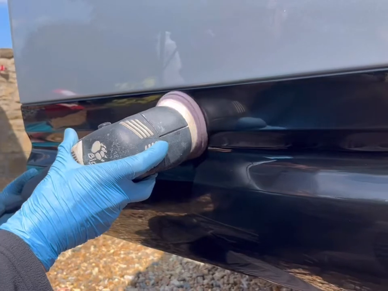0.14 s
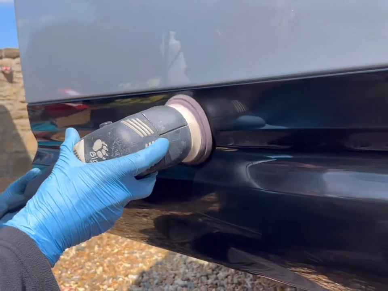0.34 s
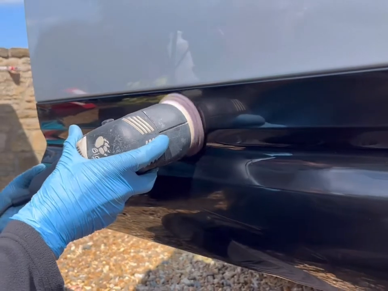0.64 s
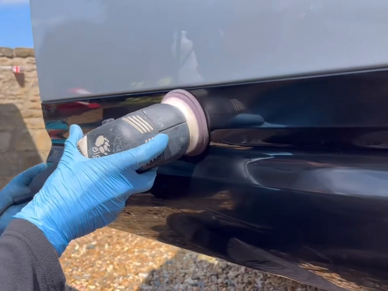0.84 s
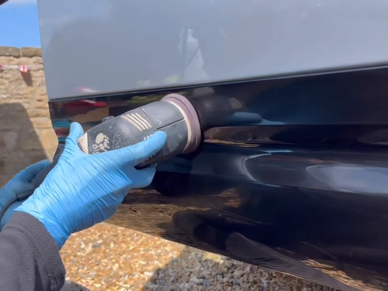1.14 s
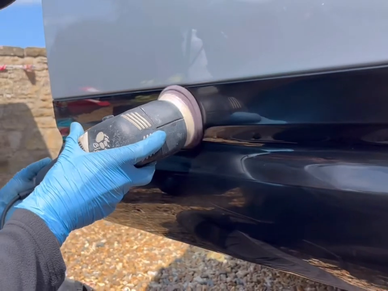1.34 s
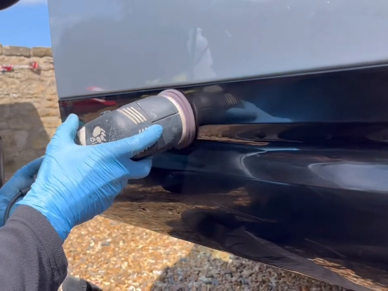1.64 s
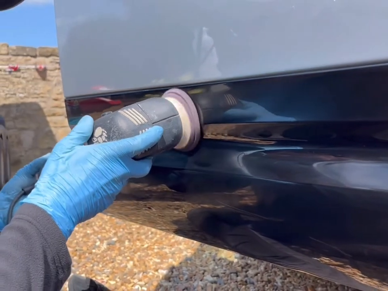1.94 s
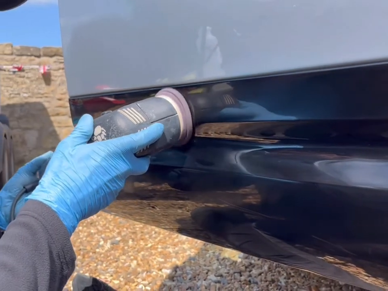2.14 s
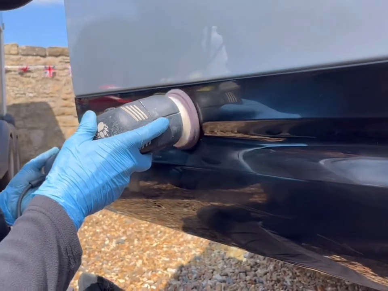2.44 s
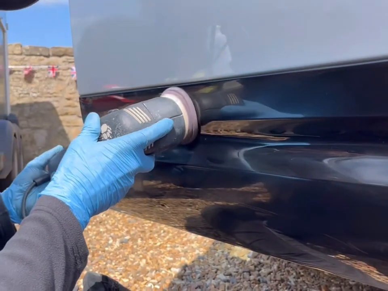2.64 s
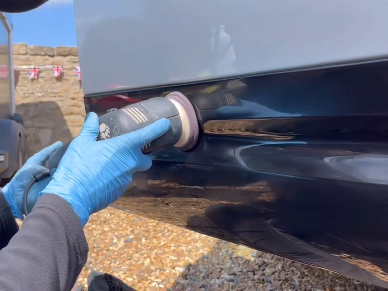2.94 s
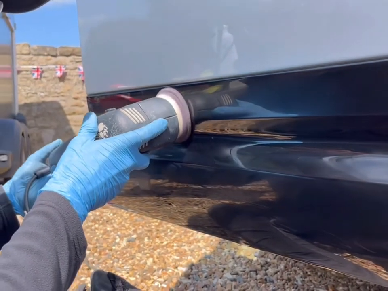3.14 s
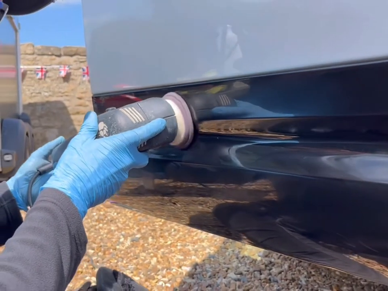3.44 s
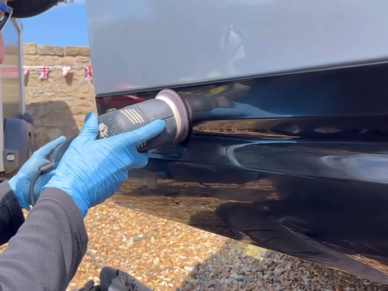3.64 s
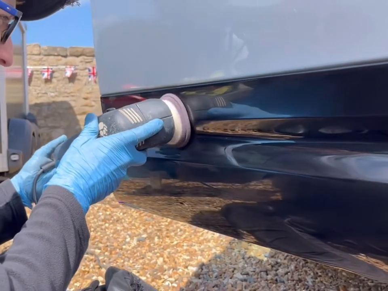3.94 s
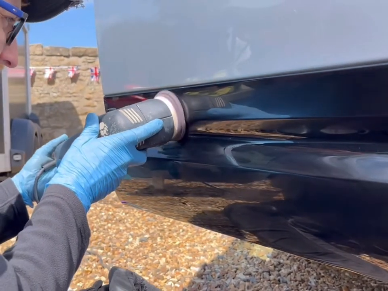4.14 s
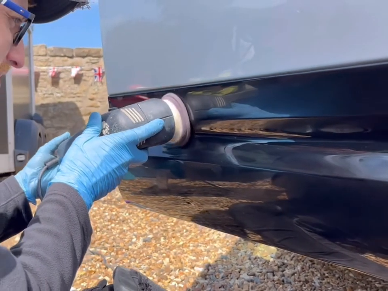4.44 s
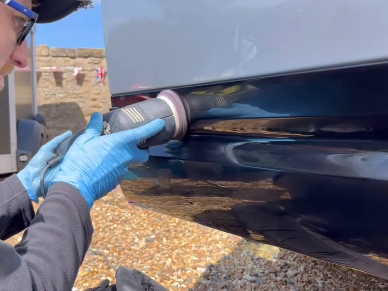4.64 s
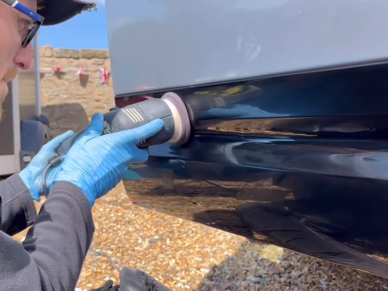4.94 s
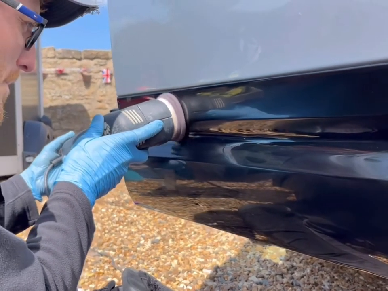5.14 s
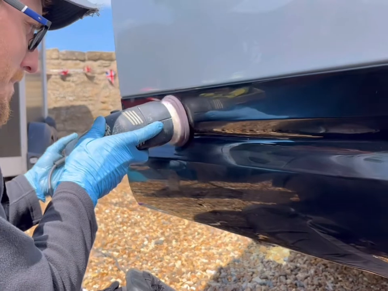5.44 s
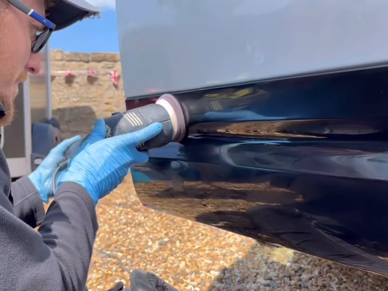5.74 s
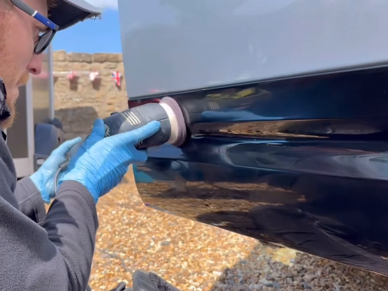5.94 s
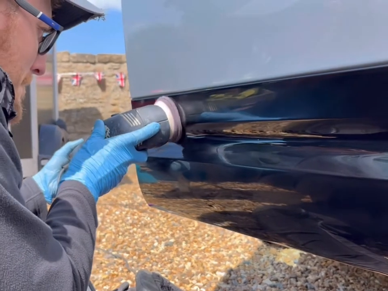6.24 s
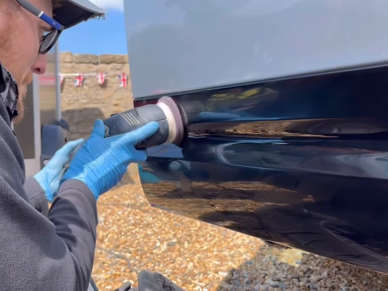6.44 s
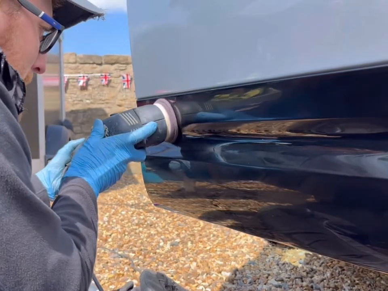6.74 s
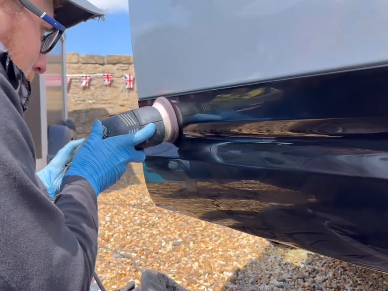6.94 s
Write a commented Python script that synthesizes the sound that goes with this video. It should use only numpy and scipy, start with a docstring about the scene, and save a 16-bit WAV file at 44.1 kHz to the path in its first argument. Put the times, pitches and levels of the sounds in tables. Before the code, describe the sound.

A close handheld phone hears an electric buffing machine already running at nearly constant speed outdoors. Its orbiting pad hums deeply and rubs the paint with a grainy buzz, while the motor sings in shifting high tones and its fan hisses. Early muffled knocks and wind buffets fade away; the hum swells around two seconds, then weakens as the tool turns away. It is still running at the end.

```python
"""A dual-action polisher buffs a car's side panel outdoors, at nearly steady speed, turning away from a phone.
The orbiting pad pumps the air with a low hum and rubs the paint, and its bearing rasps once an orbit.
The mains motor whines in sweeping lobes, and its fan and brushes rush through the vents.
Light wind reaches the microphone, and dull knocks on the phone are heard in the first second and a half."""
import sys
import numpy as np
from scipy import signal
from scipy.fft import rfft, irfft
from scipy.io import wavfile
from scipy.ndimage import uniform_filter1d

SR = 44100
rng = np.random.default_rng(int(sys.argv[2]) if len(sys.argv) > 2 else 0)


def output_pcm(signal):
    """Save a mono or channel-first signal as 16-bit PCM at the path in sys.argv[1].

    Samples are clipped to [-1, 1] before scaling.
    """
    pcm = np.clip(np.atleast_2d(signal).T, -1, 1) * 32767
    wavfile.write(sys.argv[1], SR, np.round(pcm).astype(np.int16))


N = 313551
TIME = np.arange(N) / SR  # seconds
FRAME = 2048  # samples in each slice of noise that gets its own colour
MAINS_HZ = 50
GEAR = 9 / 43  # pad orbits per turn of the motor


def undb(db):
    """Turn decibels into gain."""
    return 10 ** (np.asarray(db) / 20)


def curves(table, t=TIME):
    """Read the columns of a timed table at times t, in straight lines between rows."""
    seconds, *columns = np.transpose(table)
    return [np.interp(t, seconds, column) for column in columns]


def over_hz(table, hz):
    """Read the columns of a frequency table, in straight lines on a log axis."""
    table_hz, *columns = np.transpose(table)
    log_hz = np.log(np.maximum(hz, 1))
    return [np.interp(log_hz, np.log(table_hz), column) for column in columns]


def walk(rate):
    """Smooth chance of spread 1 that changes about rate times a second."""
    hz = np.arange(N // 2 + 1) / N * SR
    smoothing = np.exp(-(2 * hz / rate) ** 2)
    x = irfft(rfft(rng.standard_normal(N)) * smoothing, N)
    return (x - x.mean()) / x.std()


def turning(hz):
    """Angle in radians of a shaft that turns hz times a second."""
    return 2 * np.pi * np.cumsum(hz) / SR


def bell(x, centre, width):
    """A bump of height 1, half as high width / 2 from its centre."""
    return .5 ** ((2 * (x - centre) / width) ** 2)


# How the tool is held.
# Each row: time in seconds, how far the vents are turned away from 0 (facing the phone) to 1.
GRIP = [(0, 0), (1.2, 0.13), (2.3, 0.37), (3.3, 0.34), (4.1, 0.54), (5.2, 0.54), (7.1, 0.83)]


def turned(facing, away, t=TIME):
    """A value that moves from facing to away as the vents turn from the phone."""
    return facing + (away - facing) * curves(GRIP, t)[0]


# How the two microphone ports hear the tool.
# Each row: frequency in Hz, phase by which left leads in radians, likeness of the two from 0 to 1,
# level of left minus right in dB.
PORTS = [(80.0, -0.24, 0.99, -1.3), (350.0, -0.5, 0.82, 0.4), (700.0, -0.25, 0.85, -3.4),
         (1150.0, -0.35, 0.9, -3.4), (1500, -0.3, 0.74, -2.4), (1850.0, 0.0, 0.99, -1.1),
         (2350.0, 1.15, 0.8, -0.8), (2680.0, 0.5, 0.75, -1.4), (3250.0, 1.75, 0.76, 1.2),
         (4200.0, -0.1, 0.58, 0.8), (4900, -0.2, 0.72, 1.0), (5800.0, -0.6, 0.74, 1.6),
         (6600, -1.0, 0.62, 0.9), (7050.0, -1.8, 0.65, 0.4), (7400, -2.5, 0.8, 0), (7800, -3.08, 0.98, 0),
         (8300.0, -3.14, 0.998, 0), (9000, -3.2, 0.99, 0), (9400.0, -3.9, 0.88, 0), (10000, -4.4, 0.76, 0),
         (10800.0, -6.1, 0.8, 0), (11300, -6.28, 0.97, 0), (13200.0, -6.3, 0.96, 0),
         (14100.0, -8.3, 0.86, -0.1)]


def port_gains(hz):
    """Complex gains of the left and right port for sound from the tool; mean power 1."""
    lead, _, pan_db = over_hz(PORTS, hz)
    left = undb(pan_db / 2) * np.exp(.5j * lead)
    right = undb(-pan_db / 2) * np.exp(-.5j * lead)
    pair = np.array([left, right])
    return pair / np.sqrt(np.mean(abs(pair) ** 2, axis=0))


def tone(angle, hz, db):
    """A partial near hz at both ports; db is its rms level."""
    return np.sqrt(2) * undb(db) * np.real(port_gains(hz)[:, None] * np.exp(1j * angle))


def rush(drive, colour, patchy_db):
    """Turbulence of strength drive, shaped by colour(Hz, s) in dB, at both ports; rms 1 over half a second."""
    noise = rng.standard_normal((3, N)) * drive
    hz, t, (direct, *scattered) = signal.stft(noise, SR, nperseg=FRAME)
    hz = hz[:, None]
    # both ports share the direct noise, and each has scattered noise of its own
    alike = np.clip(over_hz(PORTS, hz)[1], 0, 1)
    mixed = np.sqrt(alike) * direct + np.sqrt(1 - alike) * np.array(scattered)
    # reflections off the panel shift as the tool moves, so the colour drifts in patches
    patches = rng.standard_normal(direct.shape)
    for _ in range(2):
        patches = uniform_filter1d(patches, size=6, axis=0)
        patches = uniform_filter1d(patches, size=30, axis=1, mode="wrap")
    gain = undb(colour(hz, t) + patchy_db * patches / patches.std())
    x = signal.istft(port_gains(hz) * mixed * gain, SR, nperseg=FRAME)[1][:, :N]
    return x / np.sqrt(uniform_filter1d(np.mean(x ** 2, axis=0), size=SR // 2))


def evened(x, size):
    """Noise held at even strength over size samples, so bursts land with the force given to them; rms 1."""
    power = np.mean(x ** 2, axis=0)
    for _ in range(2):
        power = uniform_filter1d(power, size=size)
    return x / np.sqrt(power)


def body(spectrum, modes, hz, t):
    """A broad spectrum with resonances that change as the tool is turned, in dB."""
    boosts = sum(bell(hz, f, width) * turned(facing, away, t) for f, width, facing, away in modes)
    return over_hz(spectrum, hz)[0] + boosts


def swells(table, hz, t):
    """Boost in dB of resonances that come and go as the tool moves."""
    return sum(db * bell(t, s, length) * bell(hz, f, width) for s, length, f, width, db in table)


def ripple(shaft):
    """The motor's torque pulses with each half wave of the mains and with each turn of the shaft."""
    return 1 + .11 * np.cos(4 * np.pi * MAINS_HZ * TIME) + .06 * np.cos(shaft)


# How strongly the pad shakes the panel.
# Each row: time in seconds, level of the hum in dB.
HUM = [(0.0, -22), (0.11, -16), (0.24, -15), (0.7, -13.5), (1.4, -13), (1.95, -12), (2.4, -12.5),
       (2.7, -14.5), (3.05, -14.2), (3.55, -15.8), (3.9, -15.5), (4.3, -15.5), (5.0, -16.5), (5.7, -18),
       (6.65, -19), (7.0, -20)]
# Overtones that swell and sink as the pad crosses bellies and nodes of the panel.
# Each key is a multiple of the orbit; each row: time in seconds, middle level in dB.
HUM_OVERTONES = { 2: [(0, -38), (0.95, -38), (1.5, -34.5), (1.9, -32.2), (2.3, -31.6), (2.8, -32.4),
                 (3.3, -35), (3.75, -38), (4.1, -41.5), (5.5, -48.5), (6.3, -55), (7.1, -56)], 3: [(0, -50),
                 (0.35, -43), (0.8, -47.5), (1.55, -42.5), (2.3, -58), (2.9, -51), (3.6, -51), (4.3, -48),
                 (5, -49), (5.6, -54.5), (7.1, -63)], 4: [(0, -50), (1.5, -50), (1.95, -69), (2.6, -56),
                 (7.1, -71)]}
# Moments when the hum dips briefly.
# Each row: middle in seconds, length at half depth in seconds, change in dB.
HUM_DIPS = [(0.195, 0.03, -2), (0.5, 0.05, -2.5), (1.094, 0.04, -2), (1.341, 0.013, -5), (1.387, 0.022, 0)]


def hum(orbit, shaft, orbit_hz, spin_hz=6.5, spin_db=-47, bearing_db=-56, beat_db=-60, waver_db=0.4):
    """The eccentric pad shakes the panel once an orbit; its slow free spin beats against that."""
    dips_db = sum(db * bell(TIME, s, length) for s, length, db in HUM_DIPS)
    harmonics = tone(orbit + np.pi, orbit_hz, curves(HUM)[0] + dips_db)
    for k, levels in HUM_OVERTONES.items():
        level_db = curves(levels)[0] + waver_db * walk(4.5)
        harmonics = harmonics + tone(k * orbit + np.pi, k * orbit_hz, level_db)
    spin = turning(spin_hz * (1 + 0.11 * walk(1.5)))
    throb = tone(orbit - spin, orbit_hz, spin_db + 2 * walk(2.7))
    # faint extra tones: a bearing cage at a third of the motor speed, and the motor beating with the orbit
    cage = tone(shaft / 3, 2 * orbit_hz, bearing_db + 2 * walk(4))
    beat = tone(shaft - orbit, 4 * orbit_hz, beat_db + 2 * walk(3.4))
    return harmonics + throb + cage + beat


def lobes(at, spacing, depth_db):
    """Broad swells and narrow gaps of a beam that sweeps past, in dB below its peak."""
    gap = undb(-depth_db) ** 2
    return 10 * np.log10(gap + (1 - gap) * np.cos(np.pi * (TIME - at) / spacing) ** 2)


# High motor tones that leave the tool in lobes that sweep past the phone.
# Each row: multiple of the motor speed, middle peak level in dB with the vents facing, the same turned away,
# time of one lobe in seconds, time between lobes in seconds, depth of the gaps in dB.
BEAMED_ORDERS = [(24, -37.5, -42.5, 3.09, 0.93, 4), (30, -46, -49.5, 1.33, 1.23, 0.5),
                 (36, -40.5, -46, 3.2, 0.86, 6)]
# Motor tones whose levels come and go as the vents turn. # Each key is a multiple of the motor speed; each row:
# time in seconds, middle level in dB.
WHINE_LEVELS = { 1: [(0, -45.5), (1, -48.5), (2.8, -49.5), (3.6, -52), (5.2, -51.5), (7.1, -49.5)],
                6: [(0, -39.5), (0.7, -43), (1.4, -41.5), (2.65, -42.5), (3, -37.5), (3.6, -34.5),
                (4.6, -36.5), (5.8, -35.5), (6.3, -43.5), (6.8, -49)], 7: [(0, -43), (1.2, -47), (2.3, -47),
                (3.3, -56), (4.2, -43), (5.4, -46), (6.1, -39), (7.1, -44)], 9: [(0, -31.5), (0.18, -38),
                (0.33, -41), (0.62, -44), (0.85, -36), (1.25, -36), (1.45, -39), (1.7, -40.5),
                (2.35, -38.5), (3.1, -56), (3.6, -46), (4.5, -44), (5.3, -64), (7.1, -60)], 10: [(0, -52),
                (2.2, -45), (3.3, -53), (7.1, -58)], 12: [(0, -45), (0.35, -40), (0.8, -47), (1.6, -44),
                (2.1, -44), (3.1, -42.5), (3.5, -44), (4.1, -40), (5.6, -40.5), (6.45, -37.5), (7, -44.5)],
                18: [(0.05, -35), (0.35, -47), (1, -36), (1.7, -43), (2.6, -38.5), (3.45, -58), (4, -41.5),
                (4.7, -48), (5.1, -43.5), (7.1, -49)]}
# Further motor tones, whose levels wander as the tool moves. # Each row: multiple of the motor speed, middle
# level in dB before a 1 dB cut.
MOTOR_ORDERS = [(2, -40), (3, -45), (4, -52), (5, -48.5), (8, -46), (11, -55), (13, -55), (16, -56),
                (17, -56), (26, -58), (27, -58), (28, -57)]
WHINE_ROUGH, WHINE_FLUTTER = 0.26, 0.28  # irregular and spinning change of strength, as parts of 1


def whine(shaft, shaft_hz, orbit, others_db=-1.0, stray_db=2.24, waver_db=0.6, fade_db=6.0):
    """Fan blades, gear teeth and commutator sing at multiples of the motor speed."""
    orders = []
    for k, facing, away, at, spacing, depth in BEAMED_ORDERS:
        beam_db = turned(facing, away) + lobes(at, spacing, depth)
        orders.append((k, beam_db + stray_db * walk(10.0)))
    for k, levels in WHINE_LEVELS.items():
        orders.append((k, curves(levels)[0] + waver_db * walk(6.9)))
    for k, db in MOTOR_ORDERS:
        # short waves fade more than long ones as the tool moves
        orders.append((k, db + others_db + fade_db * np.tanh(k / 10) * walk(5.3)))
    # the orbit shakes the whole tool, and play in the gears makes the shaft flutter
    angle = shaft + .009 * np.sin(orbit) + .0035 * walk(60)
    # the spinning pad reflects the tones, so each flutters a little
    spin = turning(9.5 + .8 * walk(2))
    total = 0
    for k, db in orders:
        flutter = 1 + WHINE_FLUTTER * np.cos(spin + 2 * np.pi * rng.random()) + WHINE_ROUGH * walk(104)
        start_angle = 2 * np.pi * rng.random()
        total = total + tone(k * angle + start_angle, k * shaft_hz, db) * flutter
    return total


# Broad colour of foam rubbing paint.
# Each row: frequency in Hz, relative level in dB per Hz.
RUB = [(60, -49), (200, -15.5), (340, -16.5), (450, -11.5), (600, -3.5), (1000, -5), (1500, -9.5),
       (1750, -12.5), (2400, -13.5), (6000, -88)]
# Resonances of the panel.
# Each row: frequency in Hz, width in Hz, boost in dB with the vents facing, boost in dB turned away.
PANEL_MODES = [(334, 59, -2, -3.5), (487, 99, 3, -0.5), (664, 105, 4.5, 4.5), (772, 70, 7, 4.5),
               (1083, 153, 8, 6), (1158, 93, 6.5, 3.5), (1384, 35, 6.5, 7.5), (1475, 96, 8.5, 2)]
# Panel resonances that swell or sink as the pad passes over them.
# Each row: middle in seconds, length in seconds, frequency in Hz, width in Hz, boost in dB.
PANEL_SWELLS = [(0.44, 0.65, 690, 150, 2.5), (2.7, 2.1, 1690, 150, -12), (3.1, 0.87, 930, 150, -4),
                (3.8, 1.3, 650, 97, 2.5), (4.87, 0.32, 670, 71, 3.5), (4.85, 0.34, 1040, 150, 4),
                (6.15, 2.1, 900, 120, 2.5), (7, 1.1, 1340, 170, 6.5), (2.4, 1.2, 1480, 180, 1.5),
                (5.06, 0.49, 520, 210, 2.5)]
RUB_DB = -28.5  # level of the rubbing at full pressure


def pad(orbit, shaft, load_db, grab_db=0.43):
    """Foam rubs the paint, buzzing with the motor's torque and fluttering as it spins, and rings the panel."""
    spin = turning(9.5 + 1.3 * walk(2))
    flutter = 1 + .075 * np.cos(spin) + .055 * np.cos(orbit + 1.8)
    drive = flutter * ripple(shaft) * undb(grab_db * walk(44))

    def colour(hz, t):
        return body(RUB, PANEL_MODES, hz, t) + swells(PANEL_SWELLS, hz, t)

    return undb(RUB_DB + load_db) * rush(drive, colour, patchy_db=0.64)


# Ring of the eccentric's bearing.
# Each row: frequency in Hz, relative level in dB per Hz.
BEARING = [(500, -45), (2200, -24), (2500, -12), (2700, -5), (2850, -7), (2950, -1), (3040, 0.5),
           (3180, -5), (3550, -19), (5000, -27), (6000, -18), (7000, -32), (15000, -55)]
RASP_DB = -26.3  # peak strength of each scrape, facing and at full pressure, before the motor's ripple


def rasp(orbit, shaft, load_db, away_db=-4.0, db_per_load=2.0):
    """Once an orbit the counterweight loads the bearing, which scrapes; quieter as the tool turns away."""
    scrape = np.exp(2.0 * (np.cos(orbit + .6) - 1)) * ripple(shaft)
    ring = rush(1, lambda hz, t: over_hz(BEARING, hz)[0], patchy_db=2.5)
    level_db = RASP_DB + turned(0, away_db) + db_per_load * load_db
    return undb(level_db) * scrape * evened(ring, size=90)


# Broad colour of the vent air.
# Each row: frequency in Hz, relative level in dB per Hz.
AIR = [(500, -12), (1500, -6), (2200, -2), (2900, 6), (3600, -8), (4500, 2), (5500, -2.5), (7500, -10),
       (9400, -13.5), (10700, -3.5), (12200, -9), (13600, -9), (15000, -45)]
# Resonances of the tool's housing.
# Each row: frequency in Hz, width in Hz, boost in dB with the vents facing, boost in dB turned away.
HOUSING_MODES = [(1950, 230, 6.2, -1), (2536, 140, 8.8, -2), (2694, 150, 0.5, 7.5), (3030, 143, 6.3, 3.5),
                 (3330, 360, 7.6, 1.5), (3880, 380, 6.2, 0), (4330, 500, 1.1, 1.5), (6250, 1400, 9.7, 4)]
# Vent slots that point at the phone, or away from it, in passing.
# Each row: middle in seconds, length in seconds, frequency in Hz, width in Hz, boost in dB.
VENT_SWELLS = [(0.4, 1.9, 3140, 650, 4.5), (2, 1.1, 3780, 220, 4.5), (3.3, 0.88, 6000, 490, 10.5),
               (4.96, 1, 2820, 340, 7), (7.1, 0.92, 4800, 250, 4.5), (3.44, 1.2, 3020, 300, 8),
               (7.1, 1.5, 3550, 330, 0), (3.2, 0.68, 11700, 3000, 3.5), (4.55, 0.5, 12000, 2500, -3),
               (5, 0.27, 11700, 2000, 4), (0.9, 2.6, 4540, 110, 2), (0.9, 1.7, 5730, 450, -4),
               (0.9, 2.2, 6120, 270, 2), (4.7, 3.5, 6500, 300, -5), (4.5, 5.0, 2850, 120, -4),
               (6.4, 0.7, 4690, 130, 4), (3.3, 1.2, 3600, 350, -2.5)]
AIR_DB, AIR_TURNED_DB = -26.5, -5  # level when facing, and its change when turned fully away


def vents(shaft, orbit, sputter_db=1.2):
    """Cooling air and sputtering brushes hiss, pulsing with the motor and slightly with the orbit."""
    pulse = ripple(shaft) + .04 * np.cos(orbit + 1.2)
    sputter = undb(sputter_db * walk(330))

    def colour(hz, t):
        return body(AIR, HOUSING_MODES, hz, t) + swells(VENT_SWELLS, hz, t)

    return undb(AIR_DB + turned(0, AIR_TURNED_DB)) * rush(pulse * sputter, colour, patchy_db=1.5)


# Colours of the steady breeze, of a gust's deep thump and of its brighter flap.
# Each row: frequency in Hz, relative level in dB per Hz.
WIND = [(15, -30), (27, -7), (42, -3), (62, 6.5), (95, -2.5), (130, -8.5), (200, -19), (300, -20),
        (600, -46), (3000, -75)]
BUFFET = [(15, -25), (35, -8), (62, 8), (110, -8), (160, -16), (300, -45), (3000, -96)]
FLAP = [(50, -24), (130, 6), (200, -3), (320, -15), (450, -22), (700, -25), (3000, -69)]
# Gusts on the microphone.
# Each row: middle in seconds, length in seconds, deep thump in dB, brighter flap in dB (before the leak).
GUSTS = [(0.008, 0.027, -21, -39), (0.076, 0.05, -23, -33), (0.15, 0.05, -29, -35), (0.45, 0.05, -29, -34),
         (0.55, 0.027, -26, -38), (0.644, 0.05, -22, -33), (0.735, 0.03, -32, -33),
         (0.874, 0.044, -27, -39), (1.06, 0.091, -30, -36), (1.157, 0.05, -30, -36),
         (1.555, 0.025, -27, -37), (1.785, 0.04, -29, -48), (1.89, 0.045, -31, -48),
         (2.602, 0.19, -34, -52), (6.116, 0.18, -34, -51)]
BREEZE_DB, LULL_DB, EASES_S, CALM_S = -33, -42, 1.1, 2.9  # the breeze holds, then dies down (before the leak)


def wind(eddy_db=1.5):
    """A breeze rumbles on the microphone and dies down; short, strong gusts thump and reach higher."""
    breeze_db = np.interp(TIME, [EASES_S, CALM_S], [BREEZE_DB, LULL_DB])
    breeze = undb(breeze_db + eddy_db * walk(24))
    rumble = rush(1, lambda hz, t: over_hz(WIND, hz)[0], patchy_db=3.0)

    def churn(spectrum):
        noise = rush(1, lambda hz, t: over_hz(spectrum, hz)[0], patchy_db=3.5)
        return evened(noise, size=700)

    thumps = sum(undb(db) * bell(TIME, s, length) for s, length, db, _ in GUSTS) * churn(BUFFET)
    flaps = sum(undb(db) * bell(TIME, s, length) for s, length, _, db in GUSTS) * churn(FLAP)
    # the slowest pressure swings leak past the diaphragm
    leak = signal.butter(2, 42, "high", fs=SR, output="sos")
    return signal.sosfilt(leak, breeze * rumble + thumps + flaps)


# Dull knocks on the hand-held phone.
# Each row: start in seconds, pitch of the thud in Hz, thud in dB, tap in dB (before the soft attack and decay).
KNOCKS = [(0.044, 88, -15, -36), (0.057, 72, -16, -16), (0.097, 135, -15, -22), (0.127, 110, -27, -29),
          (0.150, 80, -20, -31), (0.228, 110, -18, -27), (0.428, 130, -23, -29), (0.544, 130, -29, -37),
          (0.622, 125, -22, -31), (0.648, 95, -22, -34), (1.018, 140, -26, -25), (1.173, 120, -29, -27),
          (1.313, 125, -14, -34), (1.323, 140, -20, -22), (1.341, 65, -15, -34), (1.378, 100, -23, -20),
          (1.419, 110, -17, -27), (1.445, 100, -11, -23), (1.455, 85, -16, -23)]
KNOCK_ATTACK_S, THUD_T60_S, TAP_T60_S = 0.0026, .07, .055  # T60: time to fall by 60 dB
TAP_HZ = 232  # the tap's two tones lie below and above this


def knocks(upper_db=-4.0):
    """Each knock on the phone starts a deep thud and a shorter, hollow tap, which die away at once."""
    out = np.zeros(N)
    for s, thud_hz, thud_db, tap_db in KNOCKS:
        age = np.maximum(TIME - s, 0)
        low_hz, high_hz = TAP_HZ * np.exp(.06 * rng.standard_normal(2)) * [.8, 1.33]
        modes = [(thud_hz, thud_db, THUD_T60_S),
                 (low_hz, tap_db, TAP_T60_S),
                 (high_hz, tap_db + upper_db, TAP_T60_S)]
        attack = 1 - np.exp(-age / KNOCK_ATTACK_S)
        for hz, db, t60 in modes:
            decay = np.exp(-np.log(1000) * age / t60)
            out += undb(db) * attack * decay * np.sin(2 * np.pi * hz * age)
    return out


# Motor speed, which rises a little when the pad is pressed less.
# Each row: time in seconds, speed in turns per second (Hz).
SPEED = [(0.0, 390.3), (0.5, 390.1), (1.35, 391.7), (1.85, 392.8), (2.3, 392.5), (2.7, 391.8),
         (3.25, 391.8), (3.8, 391.3), (4.35, 391.9), (4.75, 391.1), (5.55, 391.8), (6.35, 390.5),
         (7.11, 390.5)]
EASE_DB, EASE_FROM_S, EASE_TO_S = -1.1, 4.6, 6.1  # the foam is pressed evenly, then a little less


def scene():
    """One motor drives the whole tool; a gear turns its speed into the pad's orbit."""
    motor_hz, = curves(SPEED)
    load_db = np.interp(TIME, [EASE_FROM_S, EASE_TO_S], [0, EASE_DB])
    shaft = turning(motor_hz)
    orbit = GEAR * shaft
    tones = hum(orbit, shaft, GEAR * motor_hz.mean()) + whine(shaft, motor_hz.mean(), orbit)
    rubbing = pad(orbit, shaft, load_db) + rasp(orbit, shaft, load_db)
    return tones + rubbing + vents(shaft, orbit) + wind() + knocks()


def record(dry):
    """The phone cuts the treble steeply above 15400 Hz."""
    return signal.sosfilt(signal.ellip(10, .1, 80, 15400, fs=SR, output="sos"), dry)


dry = scene()
out = record(dry)
output_pcm(out)
```